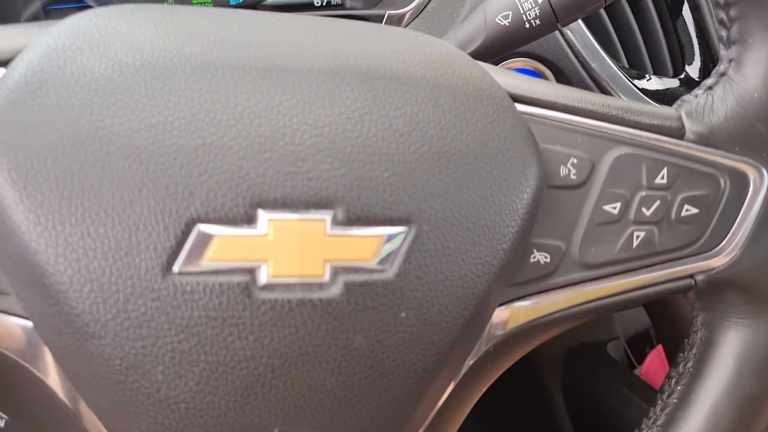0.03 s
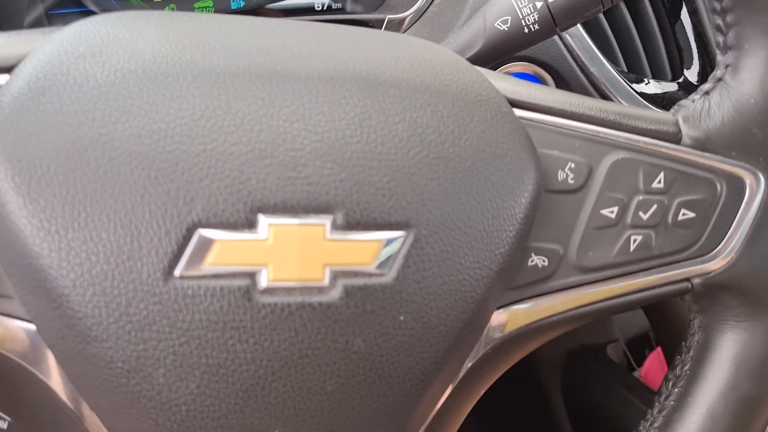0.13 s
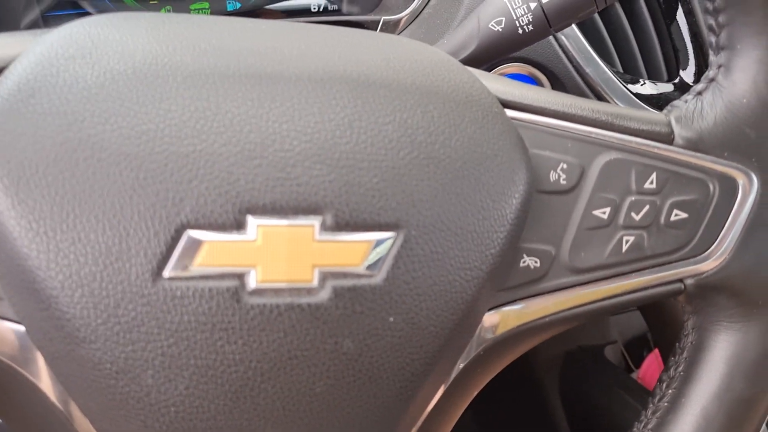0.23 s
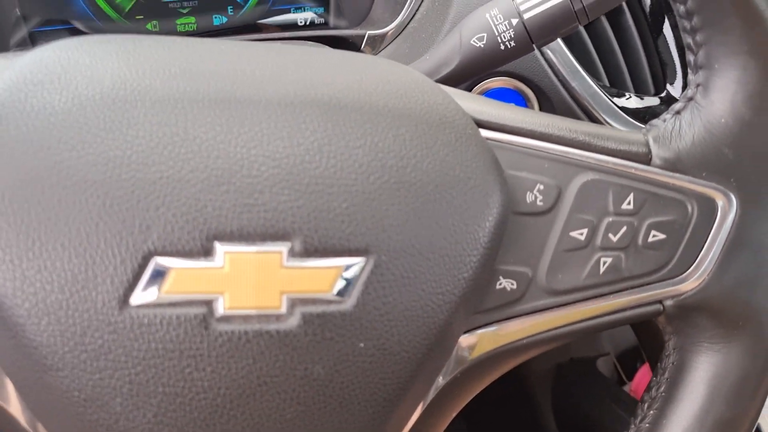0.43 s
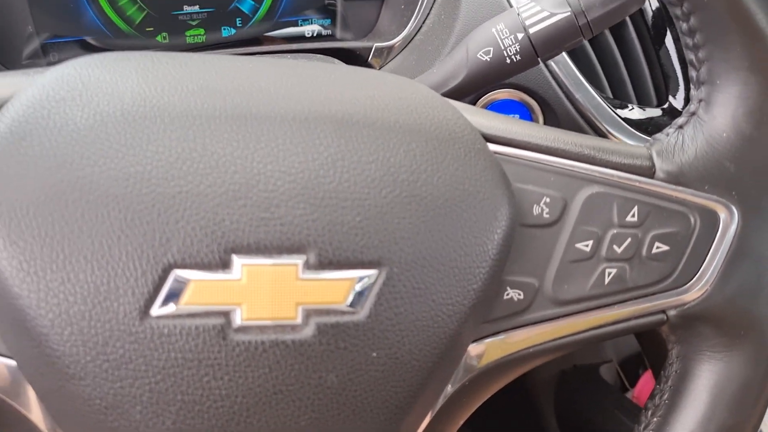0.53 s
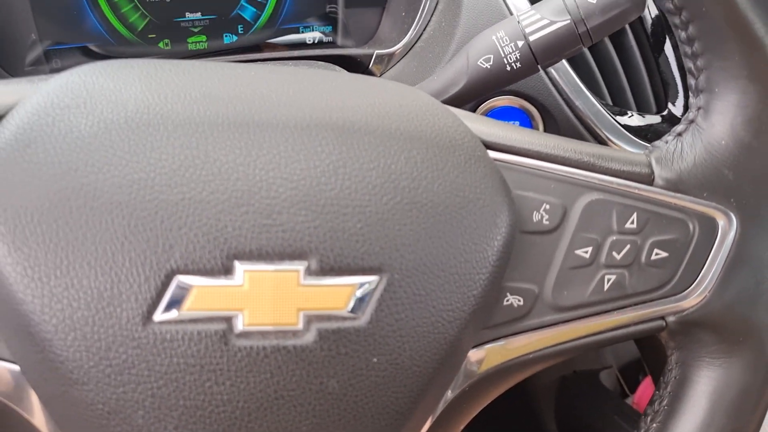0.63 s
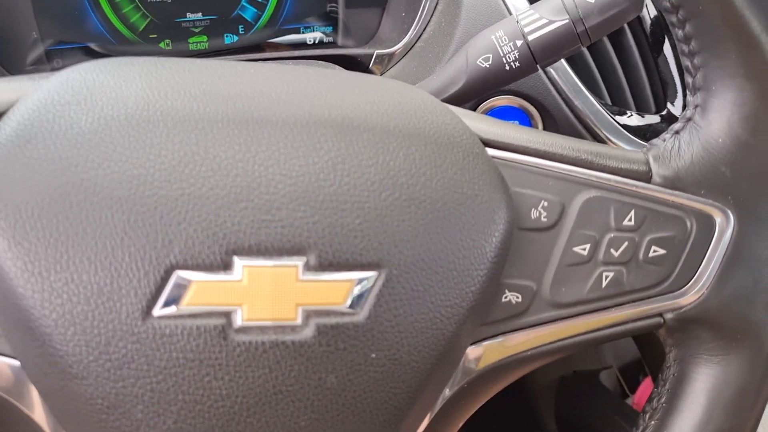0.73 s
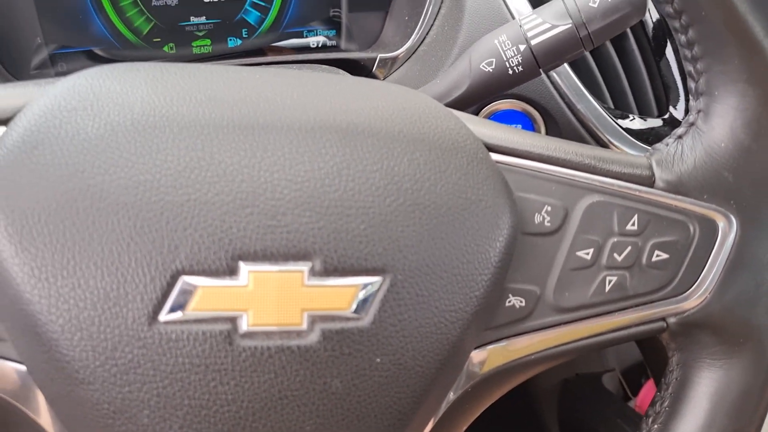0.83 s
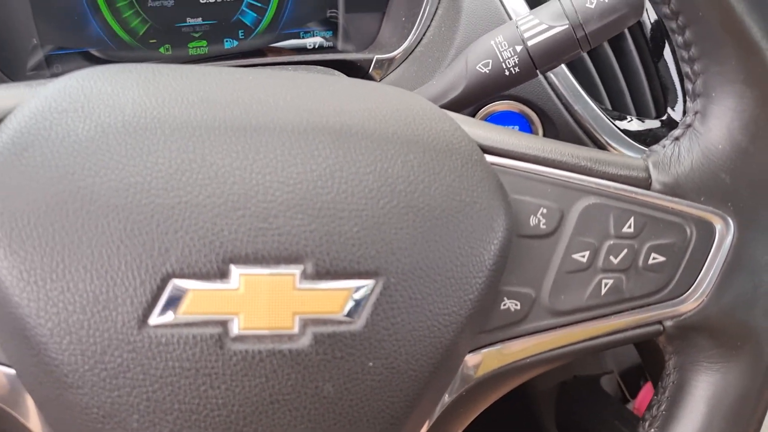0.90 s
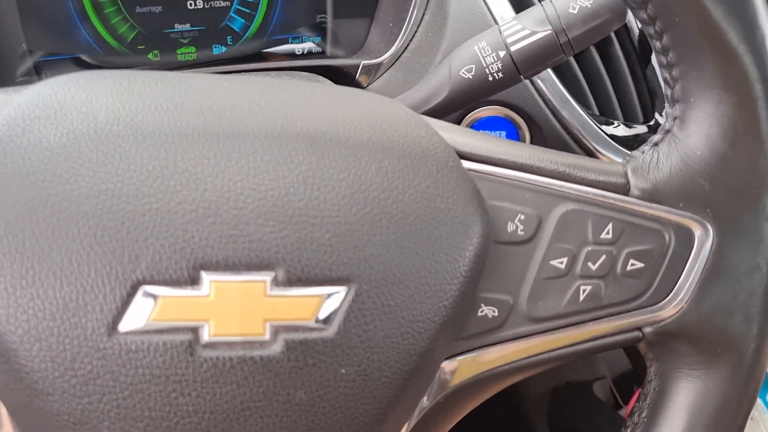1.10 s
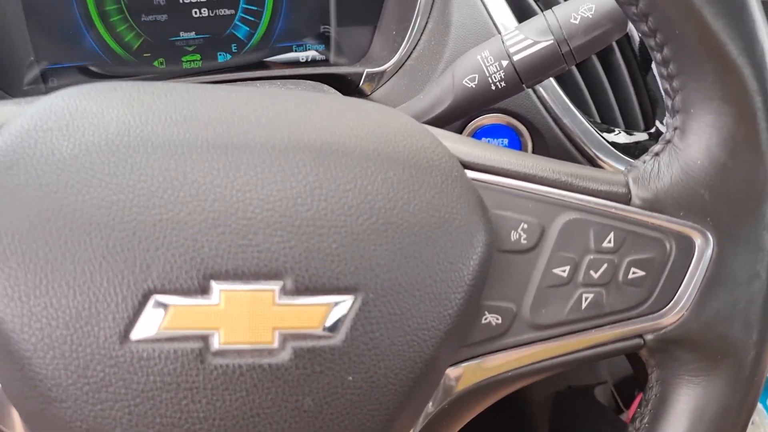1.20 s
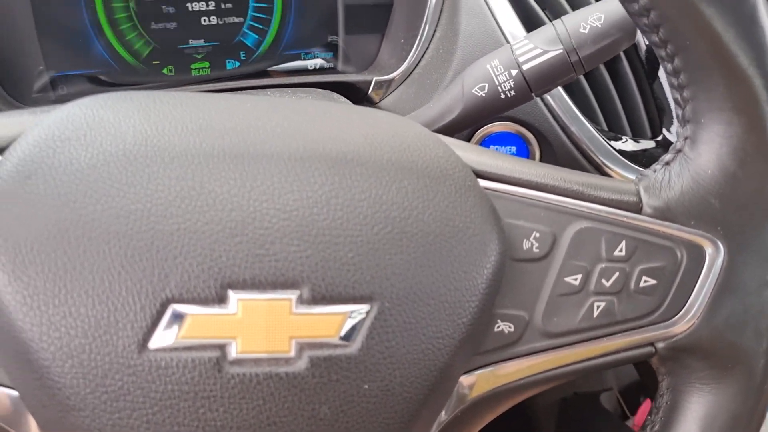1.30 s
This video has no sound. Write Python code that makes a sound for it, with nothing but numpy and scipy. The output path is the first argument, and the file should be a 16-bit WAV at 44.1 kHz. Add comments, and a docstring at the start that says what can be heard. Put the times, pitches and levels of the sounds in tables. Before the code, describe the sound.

Inside a quiet parked car, a mechanism lands with one heavy clunk and a brief rattle. Soft rubbing, creaking plastic and lighter knocks follow close by, ending in a small snap while faint ventilation rises over a low rumble.

```python
"""A quiet parked car holds a low rumble, a hum and soft rubbing. At 0.2 s a mechanism takes up, and at
0.33 s it lands with a heavy clunk: its impacts rattle the plastic trim and excite the low modes of the
cabin. Close by, plastic then creaks in small stick-slip ticks while the mechanism settles in weaker,
hollow knocks and faint ventilation grows. Near 1 s come a bright snap, two small pings and a last
knock, and the steady noise remains."""
import sys
import numpy as np
from scipy import signal
from scipy.fft import rfft, irfft
from scipy.io import wavfile
from scipy.ndimage import uniform_filter1d

SR = 44100
rng = np.random.default_rng(int(sys.argv[2]) if len(sys.argv) > 2 else 0)


def to_wav(sig):
    """Store sig (one row per channel, or 1-D mono) as 16-bit WAV at the path in sys.argv[1].

    Samples outside -1..1 are clipped; the rate is SR.
    """
    pcm = np.clip(np.atleast_2d(sig), -1, 1) * 32767
    pcm = np.round(pcm).astype(np.int16)
    wavfile.write(sys.argv[1], SR, pcm.T)  # frames by channels


N = 59535
T = np.arange(N) / SR
EVENT_T = np.arange(16384) / SR  # seconds since the start of one event
NEAR_LAG_S = 0.00047  # a sound from one side reaches the nearer microphone this much sooner


def amp(db):
    """Amplitude ratio of a level in decibels."""
    return 10 ** (np.asarray(db) / 20)


def unit(x):
    """Normalisation to an rms of 1."""
    return x / np.sqrt(np.mean(x ** 2) + 1e-20)


def read(points, hz):
    """Interpolation of a table on a logarithmic frequency axis."""
    table_hz, value = np.transpose(points)
    return np.interp(np.log(hz + 1), np.log(table_hz + 1), value)


def add(mix, at, sound):
    """Superposition: a sound joins the mix at the given second."""
    part = mix[..., max(round(at * SR), 0):][..., :sound.shape[-1]]
    part += sound[..., :part.shape[-1]]


def ring(hz, t60):
    """Free vibration of a damped mode, which falls 60 dB in t60 seconds."""
    return np.exp(-np.log(1000) * EVENT_T / t60) * np.sin(2 * np.pi * hz * EVENT_T)


def colour(x, spectrum, tilt_db=0, size=2048):
    """Minimum-phase filtering at unit energy, with the spectrum tilted by tilt_db per octave."""
    hz = np.fft.rfftfreq(size, 1 / SR)
    octaves = np.log2(np.maximum(hz, 250) / 1000)
    cepstrum = irfft(np.log(amp(read(spectrum, hz) + tilt_db * octaves)))
    cepstrum[1:size // 2] *= 2  # folding onto positive time makes the filter causal
    cepstrum[size // 2 + 1:] = 0
    taps = irfft(np.exp(rfft(cepstrum)))
    return signal.fftconvolve(x, taps / np.linalg.norm(taps))


def place(x, pan_db, lag_s):
    """Localisation by level and arrival time: positive pan and lag make the left louder and earlier."""
    n = np.arange(len(x))
    shift = round(lag_s * SR / 2)
    return np.array([np.interp(n + side * shift, n, x) * amp(side * pan_db / 2) for side in (1, -1)])


# Likeness of steady sound at the two microphones. Each row: frequency in Hz, coherence from 0 to 1.
COHERENCE = [(60, 0.5), (150, 0.91), (350, 0.72), (1200, 0.68), (5000, 0), (16000, 0.06)]
def steady(spectrum):
    """Partial coherence: stereo noise of rms 1 whose two sides are nearly independent in the treble."""
    hz = np.fft.rfftfreq(N, 1 / SR)
    left, independent = rfft(rng.standard_normal((2, N)))
    coherence = np.clip(read(COHERENCE, hz), 0, 1)
    delay = np.exp(-2j * np.pi * hz * NEAR_LAG_S)
    right = (coherence * left + np.sqrt(1 - coherence ** 2) * independent) * delay
    return unit(irfft(np.array([left, right]) * amp(read(spectrum, hz)), N))


# Cabin air. Each row: frequency in Hz, relative spectral density in dB.
AIR_SPECTRUM = [(20, -19), (40, -11.5), (56, -3), (80, -13), (140, -16.5), (250, -22.5), (420, -34.5),
                (1000, -32.5), (1500, -36.5), (4500, -39), (7000, -45), (10000, -55), (16000, -57)]
def rumble(air_db=-58, hum_hz=53.8, hum_db=-56, waver_db=0.5):
    """Bass-heavy noise lies under a low hum with slight random amplitude modulation."""
    waver = unit(uniform_filter1d(rng.standard_normal(N), size=6000))
    hum = amp(hum_db - waver_db * waver) * unit(np.sin(2 * np.pi * hum_hz * T))
    return hum + amp(air_db) * steady(AIR_SPECTRUM)


# Growth of the fan's whir. Each row: time in seconds, level in dB.
FAN_LEVELS = [(0, -67.5), (.5, -68.5), (.9, -61), (1.35, -61.5)]
# Colour of the whir. Each row: frequency in Hz, relative spectral density in dB.
FAN_SPECTRUM = [(100, -25), (450, -3), (620, 0.5), (950, 1), (1250, 3), (1450, -33), (4000, -46)]
def fan():
    """Band-limited noise of ventilation swells to a faint whir."""
    return amp(np.interp(T, *np.transpose(FAN_LEVELS))) * steady(FAN_SPECTRUM)


# Course of the rubbing. Each row: time in seconds, level in dB.
RUB_LEVELS = [(0, -67.5), (.13, -67.5), (.19, -56), (.29, -55), (.38, -65.5), (.44, -55.5), (.51, -49.5),
              (.6, -59), (.71, -56), (.77, -59), (.83, -50.5), (.92, -65), (1.01, -55.5), (1.05, -69.5),
              (1.35, -72.5)]
# Colour of the rubbing. Each row: frequency in Hz, relative spectral density in dB.
RUB_SPECTRUM = [(60, 3.5), (280, 5), (550, 5), (1500, 1), (2600, -5.5), (4300, -0.5), (6000, -10.5),
                (10500, -15), (13300, -17.5), (16000, -14.5)]
def rubbing(grain_db=2.0, pan_db=-0.5):
    """Sliding friction makes a grainy noise that swells while the parts move."""
    grain = unit(uniform_filter1d(rng.standard_normal(N), size=130))
    level_db = np.interp(T, *np.transpose(RUB_LEVELS)) + grain_db * grain
    balance = amp([[pan_db / 2], [-pan_db / 2]])
    return steady(RUB_SPECTRUM) * amp(level_db) * balance


# Bursts of chatter in the mechanism. Each row: peak time in seconds, level in dB, rise and fall
# time constants in seconds, tilt in dB per octave, pan in dB.
RATTLE_BURSTS = [(0.1867, -31, 0.0037, 0.01, -3, -1), (0.249, -49, 0.018, 0.061, -11, -6),
                 (0.2998, -26, 0.0047, 0.01, 1.2, 0), (.3115, -29.5, 0.0028, 0.0075, 0, -2.5),
                 (0.3279, -20, 0.0029, 0.0097, 2, 5), (.337, -20.5, 0.0042, .009, 1, -2.5),
                 (.359, -31.5, 0.0024, 0.012, -2, 2.5), (0.437, -40.5, 0.014, 0.009, -14, -1),
                 (.505, -36.5, 0.015, 0.015, -3.5, -2.5), (.523, -41, 0.0042, 0.028, -1.5, -0.5),
                 (0.8183, -38, 0.0075, 0.018, -4.5, -0.5), (0.831, -39, 0.0099, 0.011, -1, 4.5),
                 (1.019, -51, 0.011, 0.0052, -1, -1)]
# Colour of the chatter. Each row: frequency in Hz, relative spectral density in dB.
TRIM_SPECTRUM = [(30, -31), (110, 5.5), (220, 3), (380, -2.5), (620, -1), (1000, -5.5), (1650, -6),
                 (2600, -15.5), (3600, -19), (6500, -34), (10000, -44), (15000, -47)]
# Resonances of the trim. Each row: frequency in Hz, bandwidth in Hz, gain in dB.
TRIM_RESONANCES = [(1615, 58, 1), (1740, 11, -22), (2847, 135, 8.5)]
def rattles(contacts_per_s=4500, spread_db=3, lead_s=0.06, size=8192):
    """Forced vibration: each movement is a swarm of tiny impacts that drives the trim's resonances."""
    out = np.zeros((2, N))
    t = EVENT_T[:size] - lead_s  # zero at the peak of a burst
    for at, db, rise, fall, tilt_db, pan_db in RATTLE_BURSTS:
        signs = rng.choice([-1, 1], size)
        strengths = amp(spread_db * np.minimum(rng.exponential(1, size), 2))
        contacts = unit(signs * strengths * (rng.random(size) < contacts_per_s / SR))
        envelope = np.exp(-np.maximum(-t / rise, t / fall))
        chatter = amp(db) * colour(contacts * envelope, TRIM_SPECTRUM, tilt_db)
        add(out, at - lead_s, place(chatter, pan_db, NEAR_LAG_S * np.sign(pan_db)))
    ringing = sum(amp(db) * signal.lfilter(*signal.iirpeak(hz, hz / width, fs=SR), out)
                  for hz, width, db in TRIM_RESONANCES)
    return out + ringing


# Decay of the cabin. Each row: frequency in Hz, reverberation time t60 in seconds.
CABIN_DECAY = [(100, 0.18), (500, 0.11), (2000, 0.041), (8000, 0.05), (16000, 0.082)]
def cabin(pair, wet_db, size=8192):
    """Reverberation: dense short reflections, alike on both sides in the bass and unlike above it."""
    hz, t, noise = signal.stft(rng.standard_normal((2, size)), SR, nperseg=256)
    coherence = 1 / (1 + (hz[:, None] / 260) ** 4)
    noise[1] = coherence * noise[0] + np.sqrt(1 - coherence ** 2) * noise[1]
    decay = amp(-60 * t / read(CABIN_DECAY, hz)[:, None])
    _, tail = signal.istft(noise * decay, SR, nperseg=256)
    wet = signal.fftconvolve(pair, tail / np.linalg.norm(tail[0]), axes=1)[:, :N]
    return (pair + amp(wet_db) * wet) / np.sqrt(1 + amp(wet_db) ** 2)


# Blows on the body. Each row: start in seconds, level in dB, contact time in seconds, pitch factor.
BODY_BLOWS = [(0.188, -37, 0.0027, 1), (.2125, -32, .002, 1.1), (.317, -26, .0017, 1.1),
              (0.3295, -10.7, 0.0074, 1.063), (0.3386, -10.2, 0.0022, 1.018), (0.4014, -19, 0.008, 1.008),
              (0.5068, -36, 0.0015, 0.979), (0.5394, -31.5, 0.0014, 1.063), (0.8339, -26, 0.0073, 0.956),
              (0.8432, -24.6, 0.0045, 1.068), (1.0335, -46, 0.002, 1)]
# Boom of the cabin. Each row: frequency in Hz, relative level in dB, t60 in seconds.
CABIN_MODES = [(59.8, -2.4, 0.175), (69.2, -6.6, .215), (82.9, -14.6, 0.46), (111.6, -16, 0.31),
               (133, -1.5, 0.074), (185.6, -10, 0.055)]
def thumps():
    """Impact excitation of the cabin's low modes: longer contact acts as a low-pass and dulls the boom."""
    out = np.zeros(N)
    for at, db, contact, pitch in BODY_BLOWS:
        boom = sum(amp(mode_db) / (1 + (hz * contact) ** 2) * ring(hz * pitch, t60)
                   for hz, mode_db, t60 in CABIN_MODES)
        onset = 1 - np.exp(-EVENT_T / contact)
        add(out, at, -amp(db) * onset * boom)
    return place(out, pan_db=-1.1, lag_s=0.0002)


# Knocks on a panel. Each row: start in seconds, level in dB, pitch in Hz.
PANEL_KNOCKS = [(0.2003, -26, 275), (0.2188, -45, 222), (0.5046, -27, 274), (0.5239, -25.5, 298.5),
                (0.8208, -28, 263), (0.8332, -18.5, 307.7), (1.0229, -32.5, 305.5)]
# Ring of that panel. Each row: frequency as a ratio to the pitch, relative level in dB, t60 in seconds.
PANEL_MODES = [(1.019, -2, 0.04), (.837, -20, 0.11), (1.44, -12.5, 0.027), (4.1, -23, 0.046)]
def knocks(rise_s=0.00093):
    """Damped inharmonic modes: a hollow panel on the right rings briefly after each knock."""
    out = np.zeros(N)
    onset = np.tanh(EVENT_T / rise_s) ** 2
    for at, db, hz in PANEL_KNOCKS:
        panel = sum(amp(mode_db) * ring(hz * ratio, t60) for ratio, mode_db, t60 in PANEL_MODES)
        add(out, at, amp(db) * onset * panel)
    return place(out, pan_db=-11, lag_s=-0.0005)


def slip(db, fall_s, spectrum, tilt_db, pan_db, size=1024):
    """A broadband transient: one sudden slip of plastic on plastic gives a decaying burst of noise."""
    burst = rng.standard_normal(size) * np.exp(-EVENT_T[:size] / fall_s)
    return place(amp(db) * colour(burst, spectrum, tilt_db), pan_db, NEAR_LAG_S)


# Ticks of the creak. Each row: start in seconds, level in dB, tilt in dB per octave, pan in dB.
CREAK_TICKS = [(0.4228, -43, -3, 6), (.4615, -39, 4.5, 2), (0.476, -40.5, 4.5, -0.5), (.4975, -41, -14, -2),
               (0.519, -44.5, 4.5, 7), (0.543, -47, -1, 2), (0.5653, -45.5, 1, 9), (.586, -49, -5.5, 11),
               (0.6088, -43, -1, 6), (0.6325, -42, -1.5, 7), (0.653, -47, 0, 5), (0.671, -47, -3.5, 5),
               (0.6982, -42, -2, 2.5), (0.7118, -40.5, 5, 6.5), (0.7154, -39.5, -2, 2),
               (0.7411, -45, -1, 4), (.768, -45, 0.5, 6), (0.7912, -37, 0, 2), (.824, -37.5, 10, -4),
               (0.8314, -34, -6.5, 1), (0.8593, -45.5, 2, 10), (0.8826, -46, 0, 4),
               (0.898, -37.5, -5.5, 2.5), (0.9339, -42, -3.5, 4.5), (0.994, -39, -5.5, -3),
               (1.000, -53, -3.5, -18), (1.004, -46.5, -4.5, 14), (1.019, -48, -8, -17)]
# Colour of a tick. Each row: frequency in Hz, relative spectral density in dB.
TICK_SPECTRUM = [(200, -30.5), (900, -7), (1600, -3), (2400, -12), (3300, -2.5), (4200, 4.5), (5500, -5),
                 (8000, -9), (11000, -17.5), (12800, -8), (14300, -14), (16000, -32)]
def creak(fall_s=0.0015):
    """Stick-slip friction: plastic catches and lets go slowly enough to be heard as separate ticks."""
    out = np.zeros((2, N))
    for at, db, tilt_db, pan_db in CREAK_TICKS:
        add(out, at, slip(db, fall_s, TICK_SPECTRUM, tilt_db, pan_db))
    return out


# Colour of the snap. Each row: frequency in Hz, relative spectral density in dB.
SNAP_SPECTRUM = [(300, -28.5), (1500, -3.5), (5000, 2), (7500, 10), (10000, -2), (12500, -8.5),
                 (16000, -16)]
def snap(start_s=0.9558):
    """A single stick-slip release makes one bright snap."""
    out = np.zeros((2, N))
    add(out, start_s, slip(db=-35.5, fall_s=0.0018, spectrum=SNAP_SPECTRUM, tilt_db=0, pan_db=-8))
    return out


# Pings of loose parts. Each row: start in seconds, level in dB, pitch in Hz, t60 in seconds.
PART_PINGS = [(.995, -38.5, 3250, 0.017), (1.017, -50.5, 2880, 0.04)]
def pings():
    """Free vibration: small loose parts each ring in one high mode."""
    out = np.zeros(N)
    for at, db, hz, t60 in PART_PINGS:
        add(out, at, amp(db) * ring(hz, t60))
    return out


def scene():
    """Superposition of all sources at two microphones; rattles and small sounds reverberate."""
    mechanism = cabin(rattles(), wet_db=6.5) + thumps() + knocks()
    small_sounds = cabin(snap() + creak() + pings(), wet_db=1.5)
    return mechanism + small_sounds + rubbing() + rumble() + fan()


def record(dry, low_hz=42, high_hz=16000):
    """Band limiting: a high-pass thins the deepest bass and a low-pass cuts the highest treble."""
    thinned = signal.sosfilt(signal.butter(4, low_hz, "highpass", fs=SR, output="sos"), dry)
    lowpass = signal.firwin(511, high_hz, window=("kaiser", 9), fs=SR)
    return signal.oaconvolve(thinned, lowpass[None], "same")


dry = scene()
out = record(dry)
to_wav(out)
```